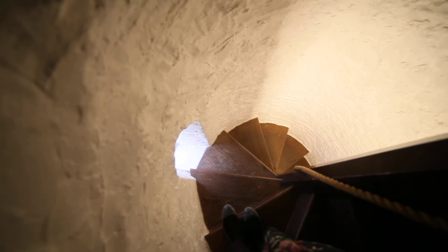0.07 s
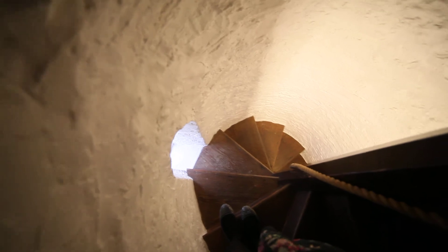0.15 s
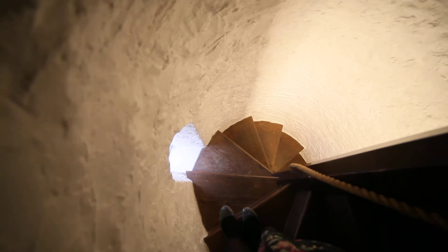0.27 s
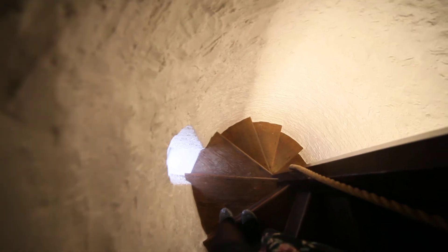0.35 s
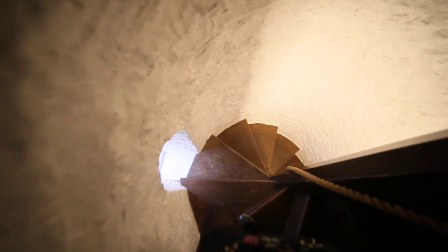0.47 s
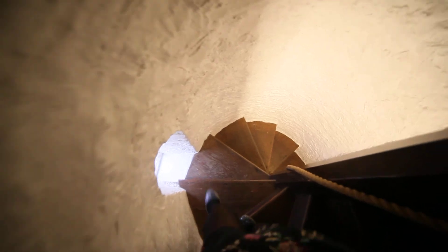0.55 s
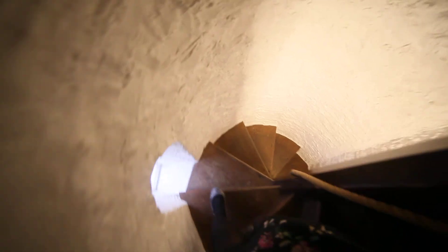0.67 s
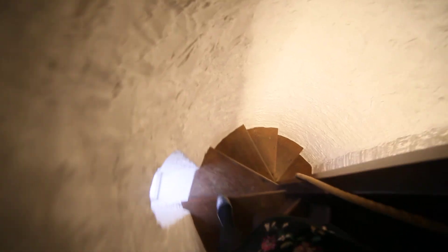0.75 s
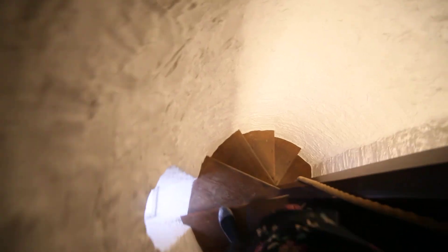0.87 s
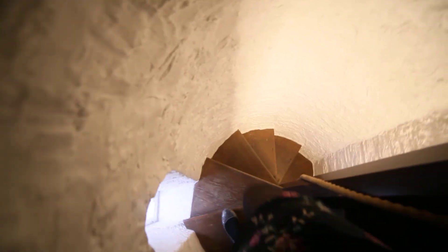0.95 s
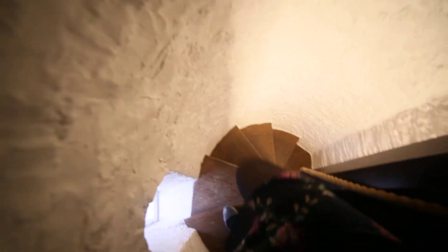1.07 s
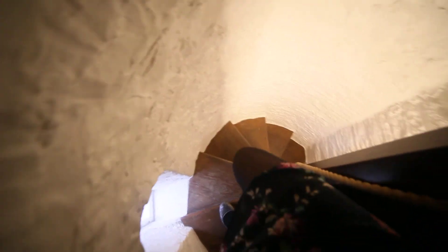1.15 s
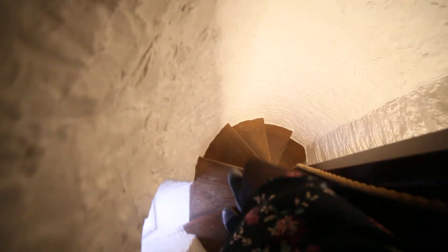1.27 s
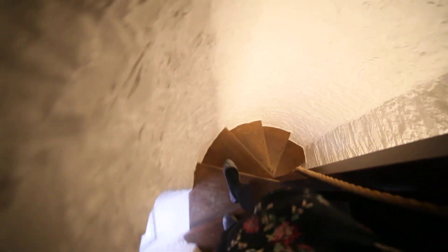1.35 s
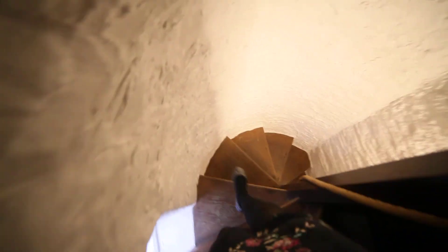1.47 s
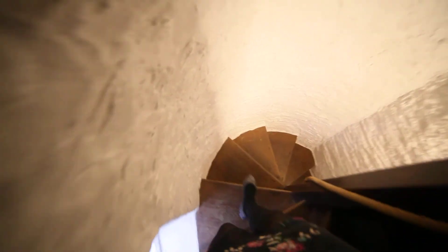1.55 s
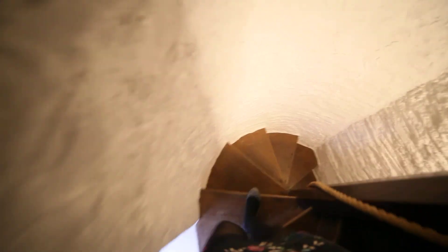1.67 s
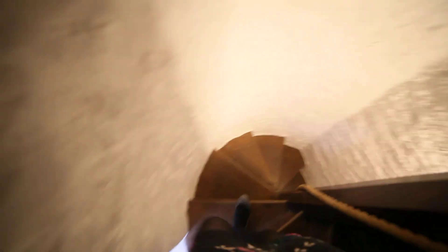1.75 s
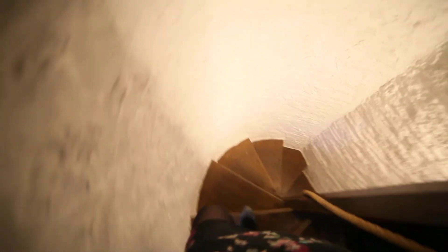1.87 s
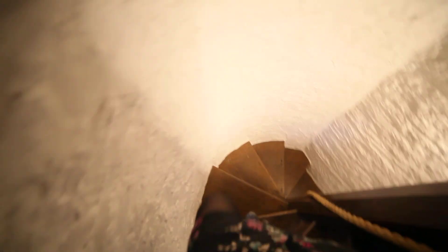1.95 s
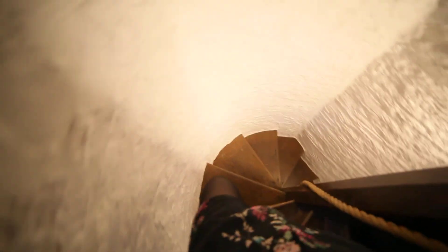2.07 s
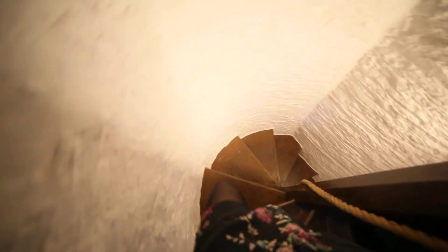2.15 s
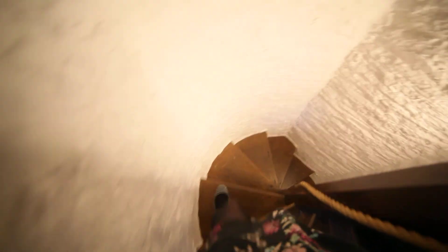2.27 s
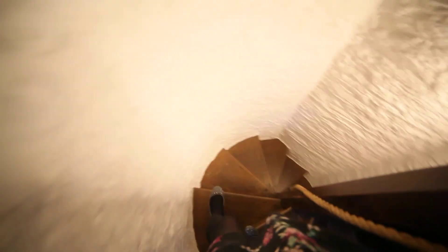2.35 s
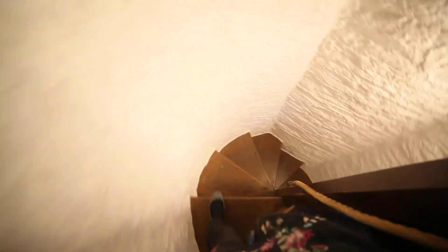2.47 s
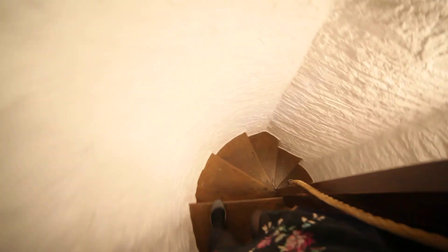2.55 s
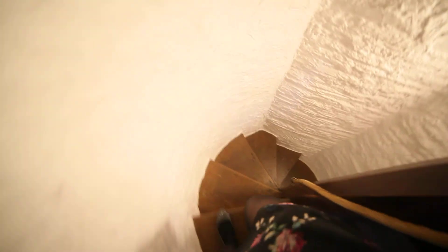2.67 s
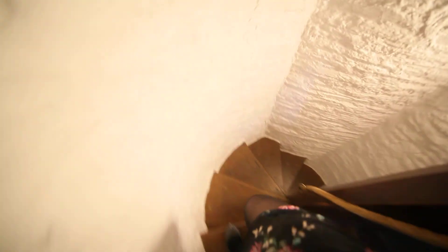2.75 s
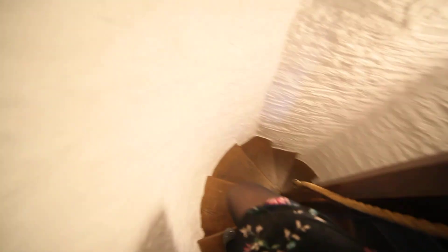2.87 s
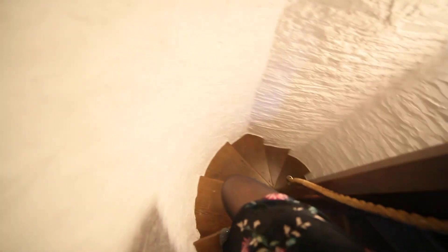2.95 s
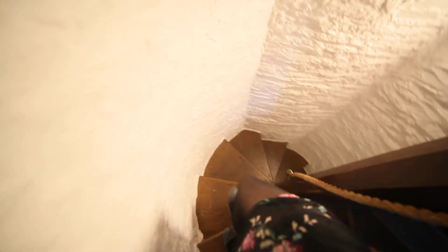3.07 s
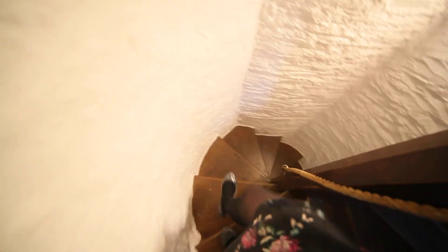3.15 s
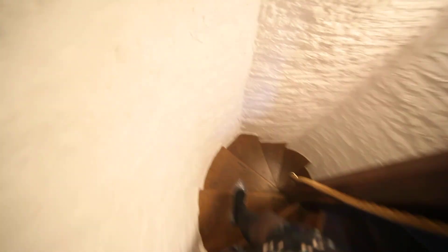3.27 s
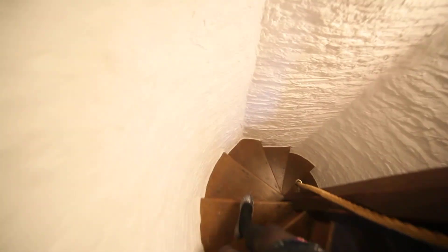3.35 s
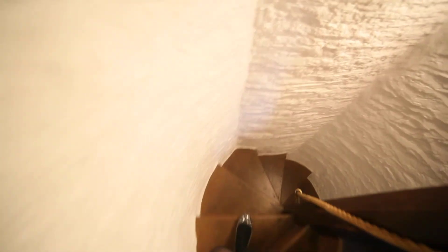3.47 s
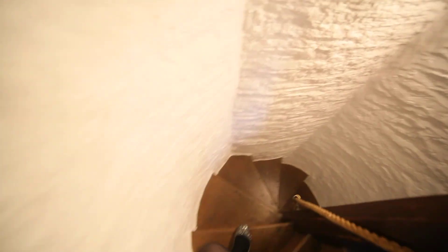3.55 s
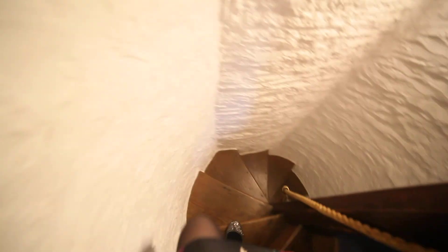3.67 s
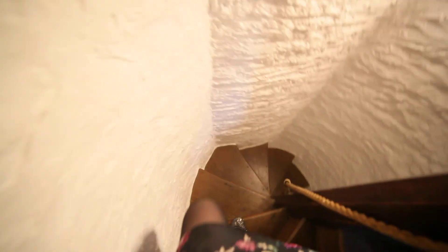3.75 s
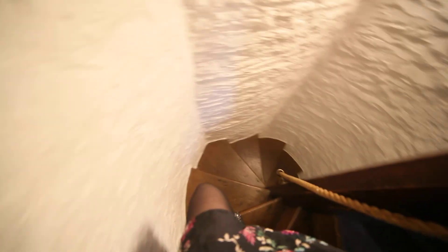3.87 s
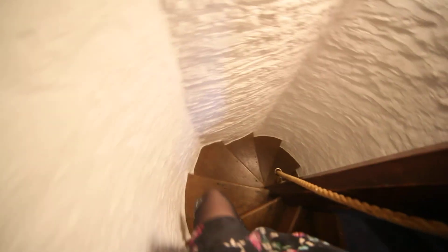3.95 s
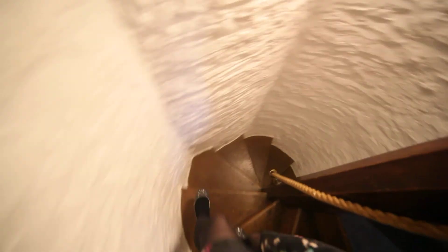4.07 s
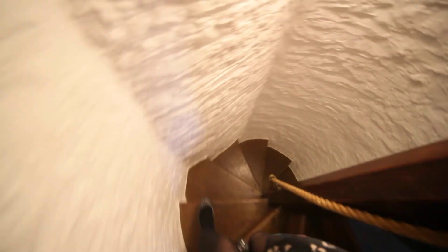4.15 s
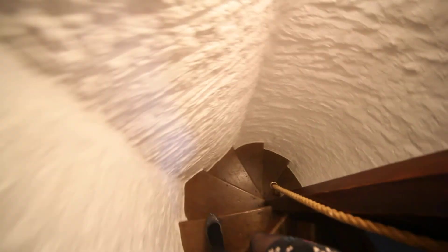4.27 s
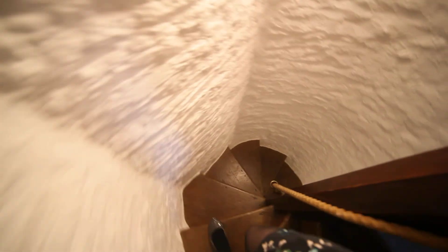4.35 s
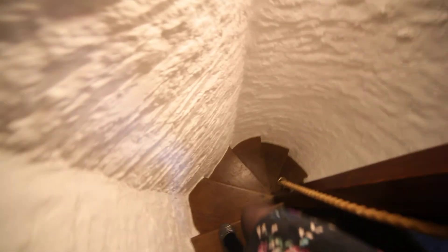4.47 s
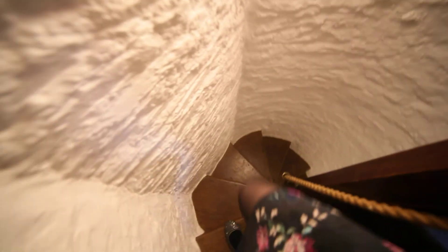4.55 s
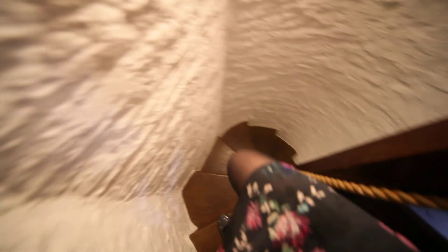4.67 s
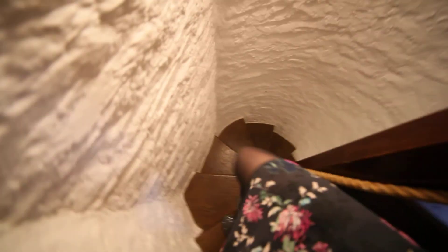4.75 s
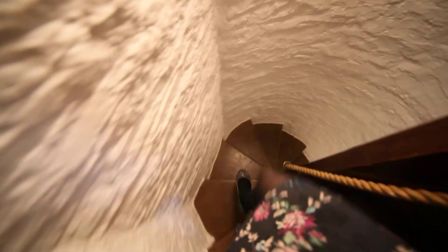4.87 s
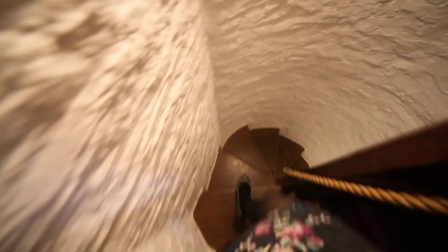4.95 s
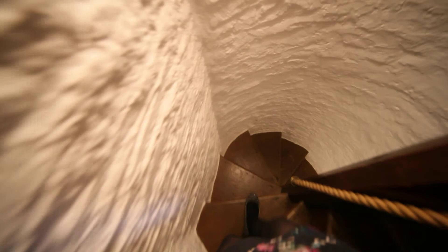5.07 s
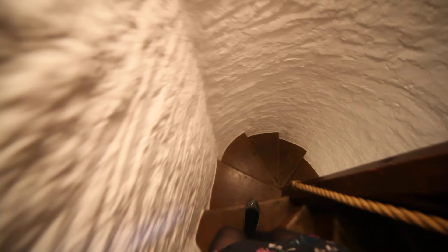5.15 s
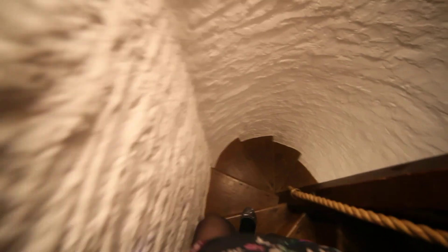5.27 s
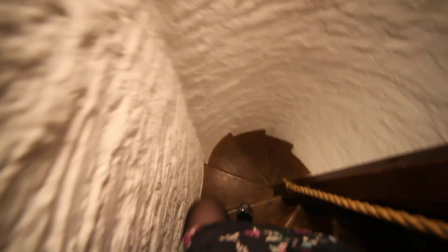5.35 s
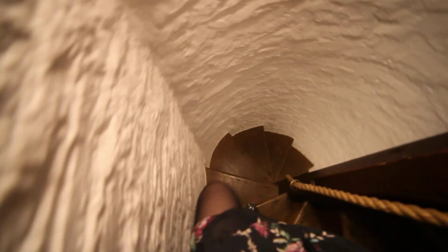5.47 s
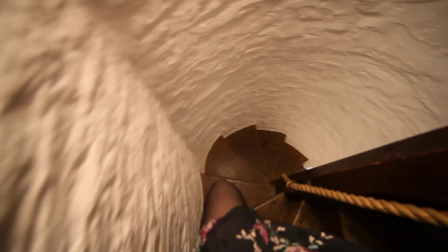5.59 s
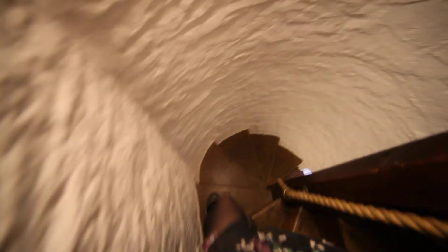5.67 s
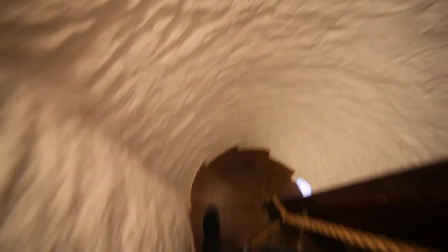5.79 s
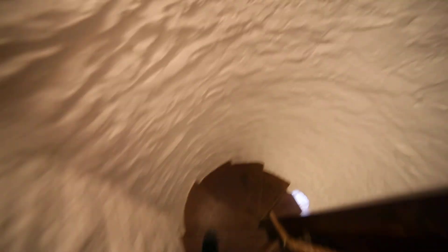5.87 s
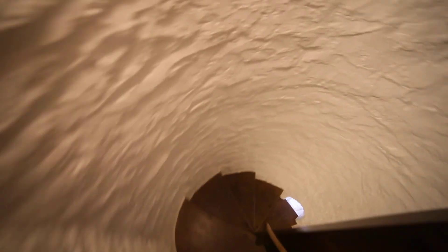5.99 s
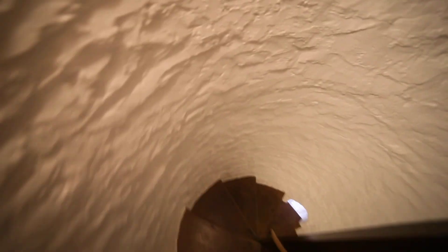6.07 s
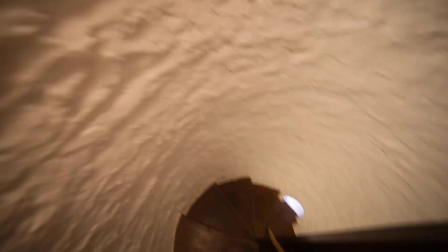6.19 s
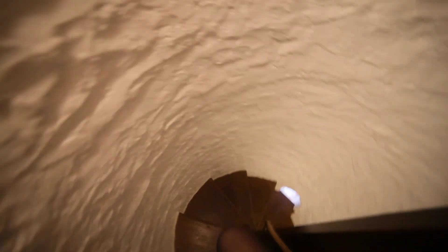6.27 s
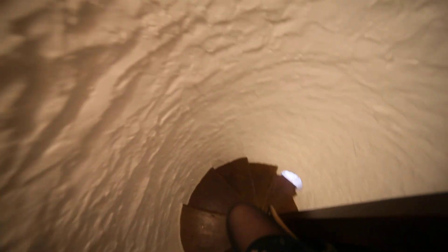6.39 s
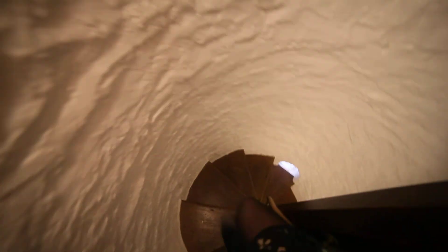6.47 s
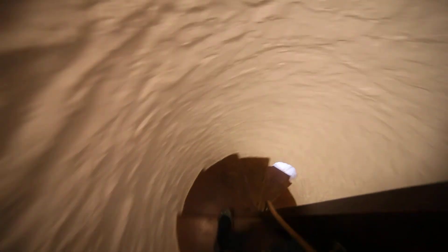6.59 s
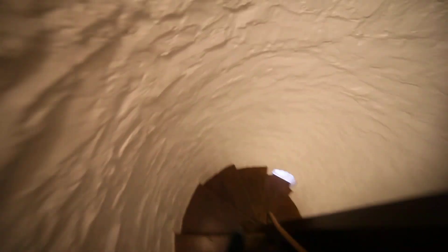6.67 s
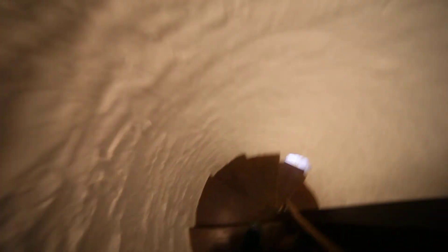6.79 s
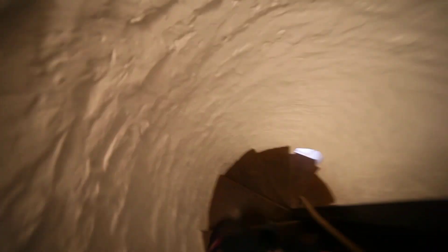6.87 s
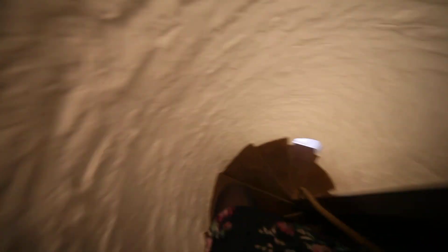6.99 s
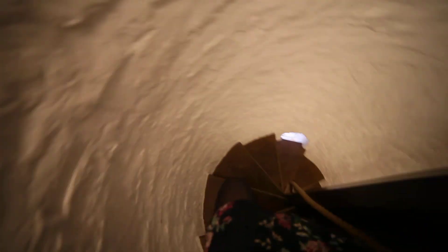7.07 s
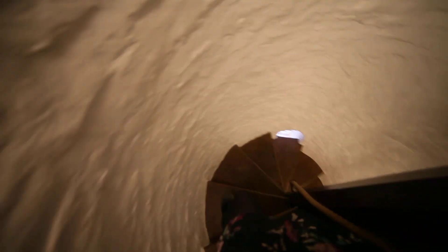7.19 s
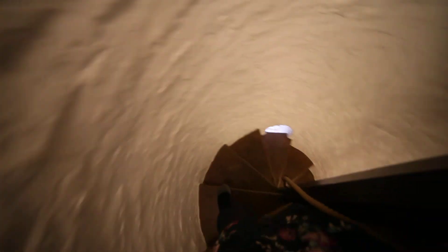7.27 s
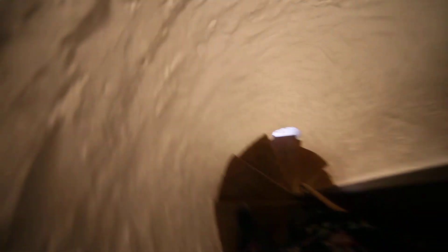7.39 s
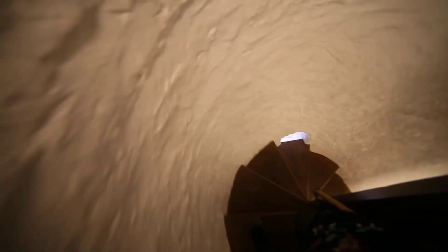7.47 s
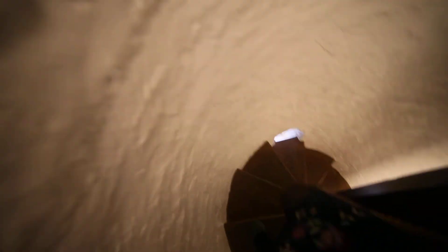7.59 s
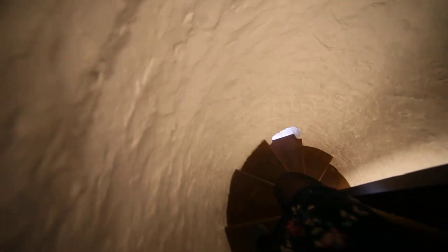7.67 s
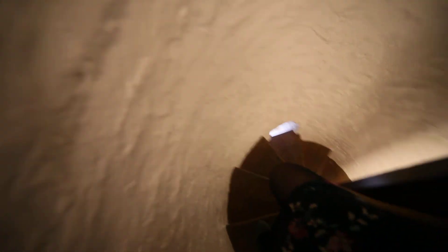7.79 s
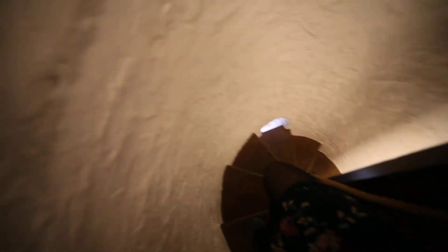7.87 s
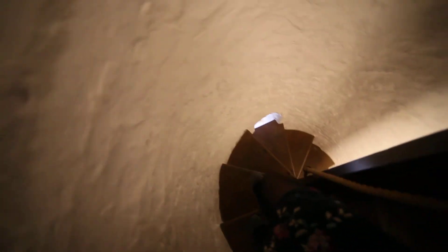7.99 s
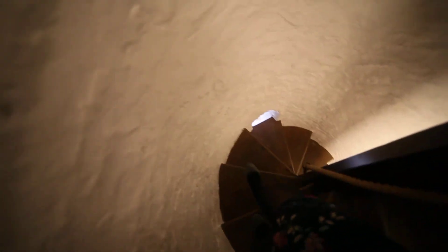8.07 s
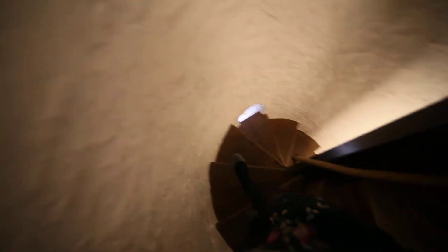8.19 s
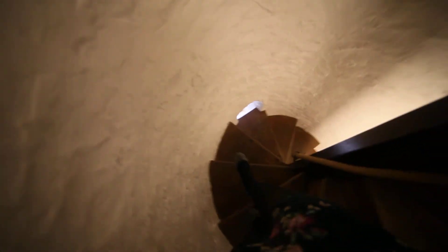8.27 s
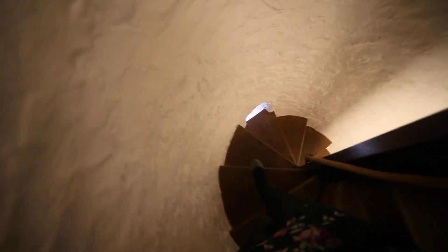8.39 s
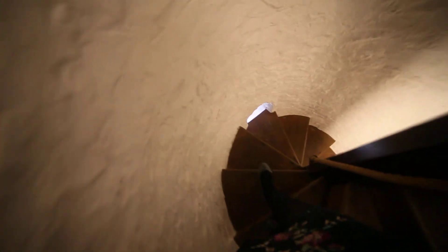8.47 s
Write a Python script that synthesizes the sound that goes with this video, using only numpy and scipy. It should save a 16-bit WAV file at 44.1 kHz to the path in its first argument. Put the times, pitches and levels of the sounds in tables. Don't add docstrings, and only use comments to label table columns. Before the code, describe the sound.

Hard-soled shoes step steadily down a wooden spiral stair, heel and toe knocking hollow boards that boom and echo in a narrow plastered shaft.

```python
import sys
import numpy as np
from scipy import signal
from scipy.io import wavfile
from scipy.ndimage import uniform_filter1d

SR = 44100
rng = np.random.default_rng(int(sys.argv[2]) if len(sys.argv) > 2 else 0)


def wrap_up_sound(samples):
    columns = np.atleast_2d(samples).T
    tamed = np.clip(columns, -1, 1)
    steps = np.round(tamed * 32767).astype(np.int16)
    wavfile.write(sys.argv[1], SR, steps)


def elevation(decibels):
    levels = np.asarray(decibels, float)
    return 10 ** (levels / 20)


N = 376169


def evened(x):
    return x / np.sqrt(np.mean(x ** 2) + 1e-20)


def peaked(x):
    return x / (abs(x).max() + 1e-12)


def read(points, hz):
    f, value = np.transpose(points)
    return np.interp(np.log(hz + 1), np.log(f + 1), value)


def add(mix, s, sound):
    part = mix[round(s * SR):][:len(sound)]
    part += sound[:len(part)]


def band(x, lo_hz, hi_hz):
    sos = signal.butter(3, [lo_hz, min(hi_hz, 20000)], "band", fs=SR, output="sos")
    return signal.sosfilt(sos, x)


def ring(modes, t, detune=1):
    hz, db, t60 = np.transpose(modes)[:, :, None]
    tones = np.sin(2 * np.pi * hz * detune * t)
    return (elevation(db - 60 * t / t60) * tones).sum(axis=0)


def hiss(spectrum, patchy_db, size=512):
    hz = np.fft.rfftfreq(size, 1 / SR)
    real, imag, patches = rng.standard_normal((4 * N // size + 8, len(hz), 3)).T
    patches = uniform_filter1d(patches, size=8, axis=0)
    patches = evened(uniform_filter1d(patches, size=12, axis=1))
    outside = (hz < spectrum[0][0]) | (hz > spectrum[-1][0])
    colour_db = np.where(outside, -60, read(spectrum, hz))
    z = (real + 1j * imag) * elevation(colour_db[:, None] + patchy_db * patches)
    return evened(signal.istft(z, nperseg=size, noverlap=3 * size // 4)[1][:N])


def swell(t, s, rise_s, fall_s, bend):
    away = np.where(t < s, (s - t) / rise_s, (t - s) / fall_s)
    return elevation(-2 * 12 * np.minimum(away, 4) ** bend)


# (pitch [Hz], t60 [s])
ECHO_TIMES = [(150, 0.22), (400, 0.65), (1000, 0.57), (2000, 0.39), (4000, 0.31), (8000, 0.28),
              (14000, 0.056)]


def walls(seed, wet_db, rise_s):
    hz, t, z = signal.stft(seed, SR, nperseg=256)
    fading = z * elevation(-60 * t / read(ECHO_TIMES, hz)[:, None])
    tail = signal.istft(fading, SR, nperseg=256)[1][:len(seed)]
    tail *= 1 - np.exp(-(np.arange(len(seed)) / SR / rise_s) ** 2)
    tail *= elevation(wet_db) / np.linalg.norm(tail)
    tail[0] += 1
    return tail


# (pitch [Hz], level [dB], t60 [s])
STAIR_TONES = [(208, -19, 1), (245, -18.5, 0.6), (298.3, -11.5, 0.43), (334.2, 1.5, 0.19),
               (386, -2.5, 0.31), (470.6, 3, 0.19), (561, 7.5, 0.4)]
# (pitch [Hz], level [dB], t60 [s])
KNOCK_TONES = [(500, -8, 0.018), (710, -12, 0.0073), (1470, -8, 0.0071), (1870, -13, 0.0092),
               (2490, -13, 0.0056)]
# (pitch [Hz], level [dB], t60 [s])
RISER_TONES = [(562, -2.5, 0.34), (694, -10, 0.23), (830, -5, 0.27), (918, -8, .25), (1056, -1, 0.46),
               (1166, -4, .22), (1250, -6, 0.28), (1377, -4, 0.2), (1534, -5, 0.17), (1975, -11, 0.18),
               (2260, -1, 0.22)]


def step(seed, db, board_hz, knock_hz, crack_hz, hollow_db, knock_db, crack_db, press_s, rise_s, roll_s,
         board_t60, wet_db, knock_t60, bright_hz, grit_s, edge):
    t = np.arange(SR * 3 // 5) / SR
    short = t[:SR // 5]
    click = short == 0
    push = signal.windows.hann(max(int(press_s * SR), 4))
    contacts = seed[-len(short):] * (1 - np.exp(-short / rise_s)) * np.exp(-short / roll_s)
    contacts[int(3 * rise_s * SR)] += edge
    detune = 1 + 0.063 * np.tanh(seed[:len(KNOCK_TONES), None])

    coupled = [(f, level - 22 * abs(np.log2(f / board_hz)), t60) for f, level, t60 in STAIR_TONES]
    stair = elevation(1) * ring(coupled, t) * (1 - np.exp(-t / 0.022))
    wood = ring([(board_hz, 0, board_t60)], t) + stair
    out = peaked(signal.fftconvolve(wood, push))[:len(t)]

    main_knock = ring([(knock_hz, 0.4 * hollow_db + 2.5, knock_t60)], short)
    knock = peaked(main_knock - ring(KNOCK_TONES, short, detune))
    add(out, 0, elevation(knock_db + 9) * peaked(signal.fftconvolve(contacts, knock)))

    snap = peaked(band(click, 7600, 11200))
    crack = peaked(band(click, crack_hz, 5890)) + elevation(-19.5) * snap
    gritty = contacts * np.exp(-short / grit_s)
    add(out, 0, elevation(crack_db + 4) * peaked(signal.fftconvolve(gritty, crack)))

    struck = []
    for (f, level, t60), luck in zip(RISER_TONES, seed[20:]):
        near_db = 6.5 * (0.5 - 2 * abs(np.log2(f / knock_hz)))
        struck.append((f, level + 3 * luck + near_db, t60))
    riser_detune = 1 + 0.0138 * seed[40:40 + len(RISER_TONES), None]
    riser = ring(struck, t, riser_detune) * (1 - np.exp(-t / 0.0051))
    out += elevation(knock_db - 4) * peaked(riser)

    thud = signal.fftconvolve(ring([(board_hz, 0, 0.03)], short), push)[:len(short)]
    hollow = peaked(band(click, 350, bright_hz)) + ring([(knock_hz, hollow_db, 0.55 * knock_t60)], short)
    colour = elevation(-1) * peaked(thud) + elevation(knock_db + 9.5) * hollow + elevation(crack_db + 10.5) * crack
    add(out, 0, signal.fftconvolve(colour, walls(seed[:len(t)], wet_db, 0.0042)[1:]))
    return elevation(db) * band(out, 180, 15000)


def snaps(rows):
    out, t = np.zeros(N), np.arange(SR // 20) / SR
    for (s, db, hz), grit in zip(rows, rng.standard_normal((len(rows), len(t)))):
        fade = np.exp(-t * hz / 14)
        add(out, s, elevation(db) * peaked(band(grit * fade, hz / 1.38, hz * 1.29)))
        add(out, s, elevation(db - 11.5) * peaked(band(grit[::-1] * fade, hz / 3.5, hz * 1.65)))
    return signal.fftconvolve(out, walls(rng.standard_normal(SR // 2), -9, 0.0049))[:N]


# (pitch [Hz], level [dB per Hz])
AIR_COLOUR = [(18, -33), (30, -5), (140, -8), (341, -5), (575, -11.5), (970, -20), (1720, -42),
              (15500, -48)]


def still_air():
    return elevation(-54.5) * hiss(AIR_COLOUR, 0.47, size=1024)


# (pitch [Hz], level [dB per Hz])
RUMBLE_COLOUR = [(15, -26), (35, -3.5), (70, 0), (110, -2.5), (200, -9.5)]
# (time [s], level [dB])
GRIPS = [(0.1, -54), (1.4, -53), (2.38, -51), (3.75, -52), (4.13, -55), (4.54, -50), (4.93, -53),
         (5.65, -45.5), (6.05, -46), (6.93, -41), (7.75, -47)]


def hand_on_camera(toe_times):
    t = np.arange(0, N / SR + 0.01, 0.002)
    power = elevation(2 * -57) + np.zeros(len(t))
    for s in toe_times:
        power += elevation(2 * -48) * swell(t, s, 0.03, 0.15, 1)
    for s, db in GRIPS:
        power += elevation(2 * db) * swell(t, s, 0.14, 0.14, 1.7)
    return np.interp(np.arange(N) / SR, t, np.sqrt(power)) * hiss(RUMBLE_COLOUR, 1.5, size=2048)


# (pitch [Hz], level [dB per Hz])
CLOTH_COLOUR = [(1500, -31), (3000, -10), (4500, 1.5), (6500, 1.5), (8000, -4), (9500, -18), (12000, -61)]
# (pitch [Hz], level [dB per Hz])
SHEEN_COLOUR = [(5000, 1), (8000, 1), (10000, -2), (12000, -7.5), (15500, -11)]
# (pitch [Hz], level [dB per Hz])
SLIDE_COLOUR = [(150, -0.5), (330, -3), (800, -2.5), (1500, 0.5), (2200, -1.5), (3300, -3), (5500, -10),
                (8000, -14.5)]
# (time [s], dying-away time [s], cloth level [dB], slide level [dB])
SETTLES = [
    (0.9, 0.2, -50.5, -43.5),
    (1.78, 0.22, -42.5, -43.5),
    (2.7, 0.2, -44.5, -43),
    (3.6, .2, -48.5, -47),
    (4.46, .3, -46, -47),
    (5.22, .33, -43.5, -42.5),
    (6.03, .22, -45.5, -40),
    (6.85, .2, -42.5, -40),
    (7.6, 0.16, -46.5, -38.5),
]
# (time [s], half length [s], cloth level [dB], slide level [dB])
SWINGS = [(0.506, .2, -58, -58), (1.393, .12, -54, -54), (1.54, .07, -55, -52), (2.284, 0.17, -54.5, -53.5),
          (3.27, 0.1, -56.5, -54), (3.85, 0.084, -60, -63), (4.134, 0.16, -53.5, -56),
          (4.95, 0.21, -54, -56), (5.503, 0.14, -62, -52), (5.757, 0.13, -51, -48.5),
          (6.275, 0.065, -49.5, -48), (6.6, .14, -49.5, -52.5), (7.2, 0.23, -55.5, -56.5),
          (7.86, 0.16, -55, -49)]
# (time [s], rise [s], fall [s], cloth level [dB], slide
# level [dB], sheen level [dB])
DRAG = (8.14, 0.22, .27, -42, -40, -57)
# (time [s], rise [s], fall [s], cloth level [dB], sheen level [dB])
SWISHES = [
    (0.31, 0.045, .06, -43.5, -59),
    (0.4, 0.044, 0.059, -47.5, -59),
    (1.75, 0.047, 0.04, -36, -46),
    (1.86, 0.041, 0.063, -42, -52),
    (3.155, 0.013, 0.056, -45, -53),
    (3.56, 0.067, .085, -41, -48.5),
    (5.22, 0.098, 0.098, -36, -44.5),
    (5.79, 0.043, 0.097, -37.5, -51),
]


def cloth_and_soles():
    t = np.arange(0, N / SR + 0.01, 0.002)
    sheen_below_db = 10.5
    moves = [(t > 0.266, -56.5, -99, -99), (1, -70, -58.5, -61.5)]
    for s, fall, cloth_db, slide_db in SETTLES:
        moves.append((swell(t, s, 0.19, fall, 1.21), cloth_db, slide_db, cloth_db - sheen_below_db))
    for s, half, cloth_db, slide_db in SWINGS:
        moves.append((swell(t, s, half, half, 2.05), cloth_db, slide_db, cloth_db - sheen_below_db))
    moves.append((swell(t, *DRAG[:3], 2.65), *DRAG[3:]))
    for s, rise, fall, cloth_db, sheen_db in SWISHES:
        moves.append((swell(t, s, rise, fall, 2.3), cloth_db, -99, sheen_db))
    powers = [sum(move[0] * elevation(2 * move[k]) for move in moves) for k in (1, 2, 3)]
    cloth, slide, sheen = (np.interp(np.arange(N) / SR, t, v) for v in np.sqrt(powers))
    return cloth * hiss(CLOTH_COLOUR, 1.4) + sheen * hiss(SHEEN_COLOUR, 1.0) + slide * hiss(SLIDE_COLOUR, 1.7)


# (time [s], board level [dB], knock pitch [Hz], knock level [dB], crack level [dB])
SCUFFS = [
    (0.275, -40, 1470, -2.5, -1.5),
    (0.384, -46.5, 1660, 1, 1),
    (2.445, -41.5, 1820, -10, -5),
    (3.144, -45.5, 1180, -8.5, 7),
    (5.763, -40, 1730, -14.5, 1),
]


def scuffs():
    out = np.zeros(N)
    for row, seed in zip(SCUFFS, rng.standard_normal((len(SCUFFS), SR))):
        s, db, knock_hz, knock_db, crack_db = row
        add(out, s, step(seed, db, 302.7, knock_hz, 2700, -16, knock_db, crack_db,
                         press_s=0.0018, rise_s=0.015, roll_s=0.057, board_t60=0.39, wet_db=6.5,
                         knock_t60=0.0091, bright_hz=2310, grit_s=0.021, edge=3.1))
    return out


# (pitch [Hz], level [dB], t60 [s])
SHAFT_TONES = [(106.1, 0.5, 0.6), (113.2, 7, 0.47)]
# (time [s], level [dB])
BOOMS = [(0.305, -45.5), (0.712, -24.5), (1.028, -43), (1.596, -25.5), (1.914, -37), (2.508, -24.5),
         (2.851, -43), (3.381, -20), (4.169, -41), (4.265, -25), (4.601, -46.5), (5.055, -20), (5.379, -43),
         (5.876, -23), (6.298, -44.5), (6.714, -20.5), (7.406, -29), (7.746, -38)]


def booms():
    out, t = np.zeros(N), np.arange(SR) / SR
    beating = ring(SHAFT_TONES[:1], t) - ring(SHAFT_TONES[1:], t)
    boom = peaked(beating * (1 - np.exp(-t / 0.0047)))
    for s, db in BOOMS:
        add(out, s, elevation(db - 1) * boom)
    return out


# (time [s], board level [dB], board pitch [Hz], knock level [dB], crack level [dB])
HEELS = [(0.623, -36, 262, -16, -26), (0.895, -16.5, 264.5, -19, -37), (1.785, -24.5, 277, -15.5, -24),
         (1.917, -37, 297, -6.5, -10), (2.676, -17.5, 363, -9, -28), (3.564, -23.5, 302, -14.5, -31),
         (3.897, -41, 305, -9.5, -18), (4.169, -38, 288, -25, -15), (4.442, -17.5, 367, -6, -41),
         (5.215, -14.5, 286.6, -19.5, -31), (5.378, -33, 288, -22, -5), (6.012, -15.5, 350, -7.5, -30),
         (6.931, -26, 241, -10, -25), (7.571, -13.5, 299, -11, -10), (7.731, -16, 286, -18.5, -19.5)]


def heels():
    out = np.zeros(N)
    for row, seed in zip(HEELS, rng.standard_normal((len(HEELS), SR))):
        s, db, board_hz, knock_db, crack_db = row
        add(out, s, step(seed, db, board_hz, 860, 2700, -16, knock_db, crack_db,
                         press_s=0.0024, rise_s=0.0006, roll_s=0.0045, board_t60=0.14, wet_db=-1.5,
                         knock_t60=0.013, bright_hz=1430, grit_s=0.0095, edge=1.8))
    return out


# (time [s], level [dB], pitch [Hz])
TAPS = [(0.699, -30, 424), (1.51, -43.5, 554), (5.379, -32.5, 477), (2.454, -33.5, 573),
        (3.147, -40.5, 1800), (4.663, -37, 3300), (4.78, -41, 560), (4.906, -38, 3000), (5.021, -38, 573),
        (5.507, -37.5, 530), (6.682, -35.5, 565), (7.183, -45, 935), (7.737, -31, 1600)]


def taps():
    return snaps(TAPS)


# (time [s], board level [dB], knock level [dB], crack level [dB])
TOES = [
    (0.711, -12, -10, -5.5),
    (1.596, -16.5, -7, -10.5),
    (2.512, -20.5, 2, 1),
    (3.379, -10, -11.5, -9.5),
    (4.264, -14.5, -6.5, -3.5),
    (5.049, -16.5, -7, -6),
    (5.881, -14, -6.5, -4.5),
    (6.717, -13, -7, -9.5),
    (6.785, -10.5, -19.5, -13.5),
    (7.408, -24, 6.5, 6.5),
]
# (board pitch [Hz], knock pitch [Hz], lowest crack pitch [Hz], hollow knock level [dB])
TREADS = [
    (278, 1195, 2670, -20),
    (309, 1170, 2960, -24),
    (304, 1050, 3220, -3),
    (310, 870, 3660, -16),
    (288, 904, 2560, -14),
    (302, 1275, 2800, -15),
    (294, 1320, 2200, -11),
    (250, 950, 3200, -12),
    (273, 910, 2200, -16),
    (324, 1030, 2520, -11),
]


def toes():
    out = np.zeros(N)
    for row, tread, seed in zip(TOES, TREADS, rng.standard_normal((len(TOES), SR))):
        s, db, knock_db, crack_db = row
        add(out, s, step(seed, db, *tread, knock_db, crack_db,
                         press_s=0.0011, rise_s=0.000369, roll_s=0.015, board_t60=0.089, wet_db=3,
                         knock_t60=0.022, bright_hz=2120, grit_s=0.0083, edge=4.6))
    return out


# (time [s], level [dB], pitch [Hz], t60 [s])
POST_HUMS = [
    (.9, -27, 245, 0.58),
    (5.884, -18, 211.5, 0.35),
    (6.722, -21.5, 208, 0.87),
    (7.574, -27, 212, 0.63),
]


def post():
    out, t = np.zeros(N), np.arange(SR) / SR
    for s, db, hz, t60 in POST_HUMS:
        add(out, s, ring([(hz, db, t60)], t) * (1 - np.exp(-t / 0.0092)))
    return out


# (time [s], level [dB], pitch [Hz])
TICKS = [(1.0605, -37, 4910), (1.1822, -33.5, 5860), (1.9854, -33, 3400), (2.4547, -28.5, 5640),
         (3.147, -34, 4520), (3.8348, -29.5, 4800), (4.1165, -41, 6280), (4.662, -34.5, 6150),
         (4.7386, -39, 5050), (4.78, -31, 2120), (4.906, -36, 5150), (7.073, -20.5, 5600),
         (7.1403, -23.5, 4840), (7.2966, -33, 6200)]


def ticks():
    return snaps(TICKS)


# (start [s], end [s], pitch [Hz], level [dB])
CREAKS = [
    (2.2, 2.415, 605, -56),
    (4.9, 5.05, 1560, -60),
    (5.25, 5.695, 1630, -57.5),
    (6.12, 6.26, 1860, -54),
    (8.38, 8.536, 1420, -62),
]


def creaks():
    out = np.zeros(N)
    for (start, end, hz, db), rub in zip(CREAKS, rng.standard_normal((len(CREAKS), SR // 2))):
        whistle = evened(band(rub, hz * 0.95, hz * 1.05))[:int((end - start) * SR)]
        add(out, start, elevation(db) * whistle * signal.windows.tukey(len(whistle), 0.5))
    return out


# (time [s], level [dB], pitch [Hz])
BUMPS = [
    (7.174, -34, 60),
    (7.24, -35, 68),
    (7.315, -41, 88.3),
]


def bumps():
    out, t = np.zeros(N), np.arange(SR // 8) / SR
    for s, db, hz in BUMPS:
        add(out, s, elevation(db + 5.5) * ring([(hz, 0, 0.15)], t) * (1 - np.exp(-t / 0.006)))
    return out


def scene():
    mix = still_air() + hand_on_camera([toe[0] for toe in TOES]) + cloth_and_soles()
    mix += scuffs() + booms() + heels() + taps() + toes()
    mix += post() + ticks() + creaks() + bumps()
    return np.array([mix, mix])


def band_limit(x):
    return signal.sosfilt(signal.butter(12, 16300, fs=SR, output="sos"), x)


def record(dry):
    mid = 0.95 * np.tanh(dry[0] / 0.95)
    hz, t, z = signal.stft(mid, SR, nperseg=2048)
    pick, centre = rng.random((2, len(t)))
    near = abs(np.log(hz[:, None] / (4500 * 3.2 ** centre))) < 0.1
    swapped = (pick < 0.09) & near
    loudness = abs(z).sum(axis=0)
    calm = loudness < 4 * np.median(loudness)
    turned = abs(z) * swapped * calm * np.exp(2j * np.pi * rng.random(z.shape))
    side = signal.istft(turned, SR, nperseg=2048)[1][:N]
    return band_limit(np.array([mid + side, mid - side]))


dry = scene()
out = record(dry)
wrap_up_sound(out)
```